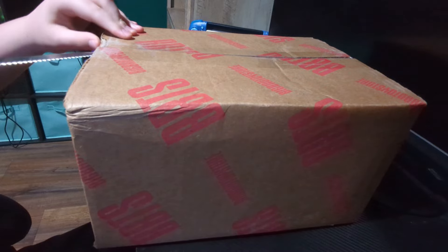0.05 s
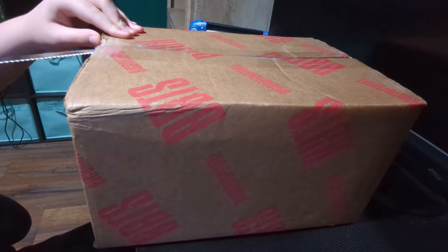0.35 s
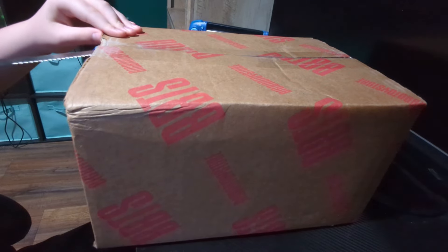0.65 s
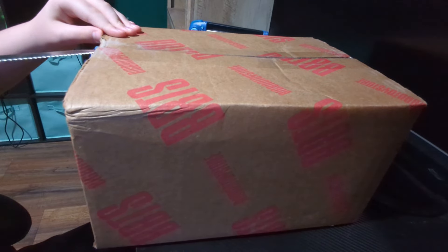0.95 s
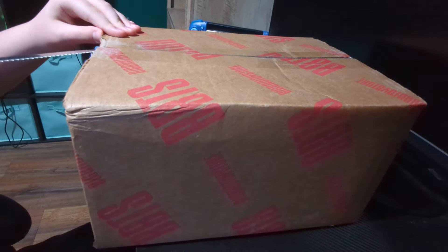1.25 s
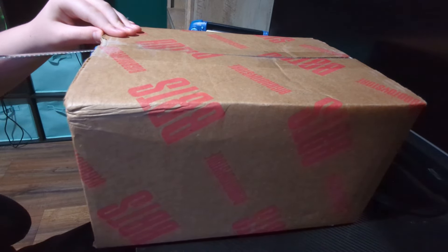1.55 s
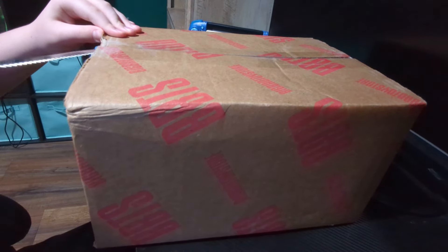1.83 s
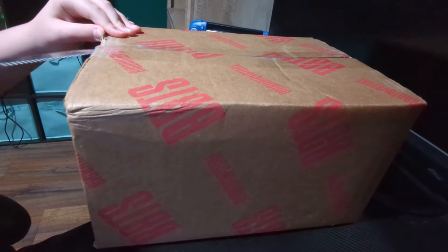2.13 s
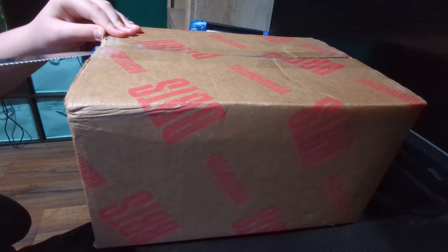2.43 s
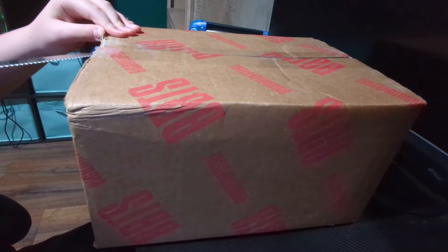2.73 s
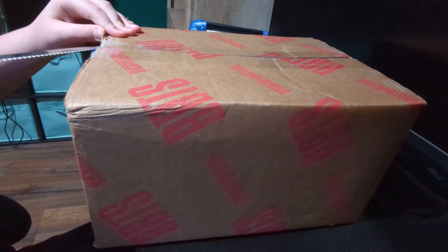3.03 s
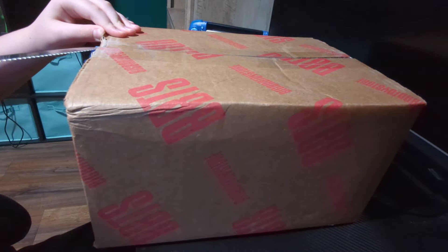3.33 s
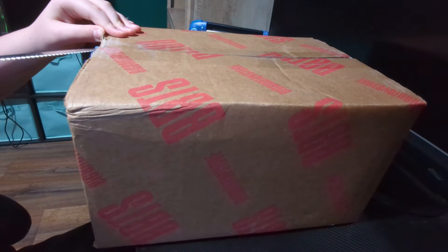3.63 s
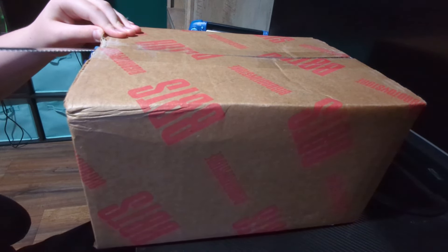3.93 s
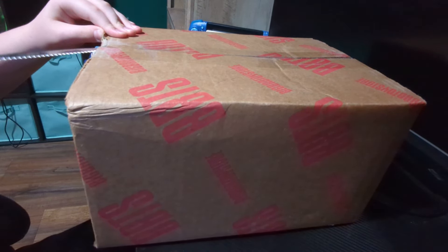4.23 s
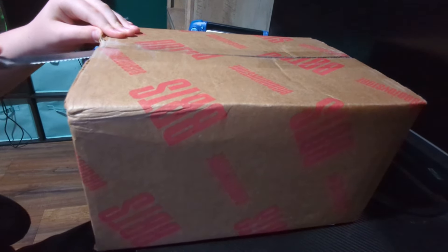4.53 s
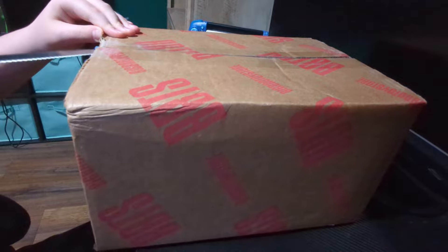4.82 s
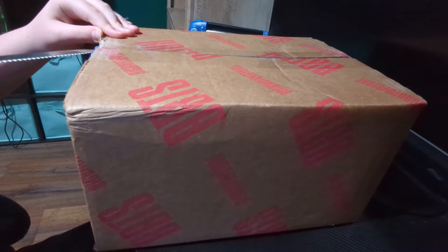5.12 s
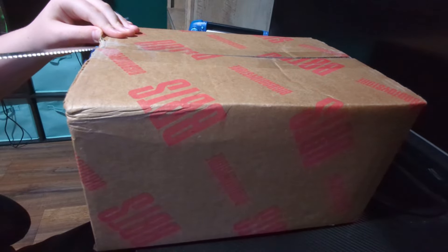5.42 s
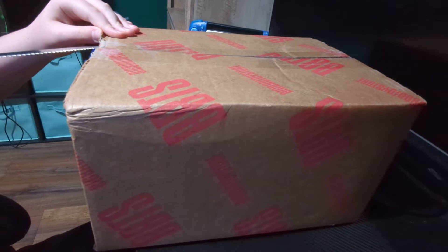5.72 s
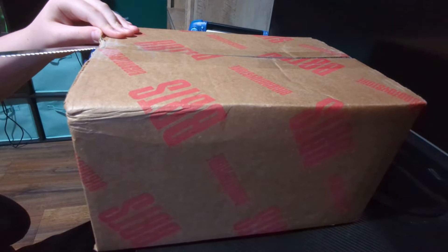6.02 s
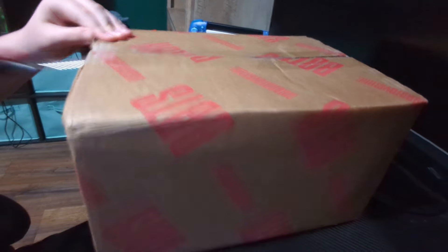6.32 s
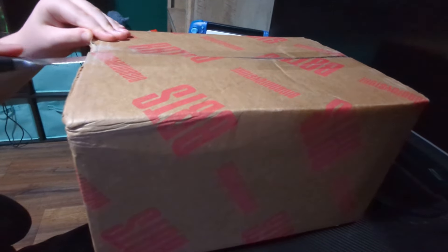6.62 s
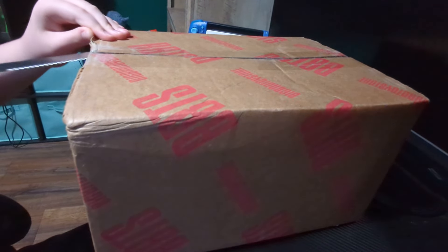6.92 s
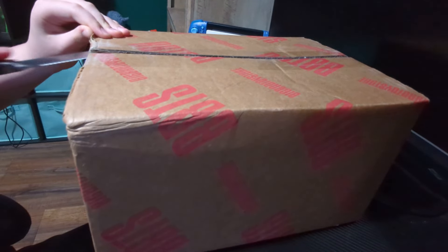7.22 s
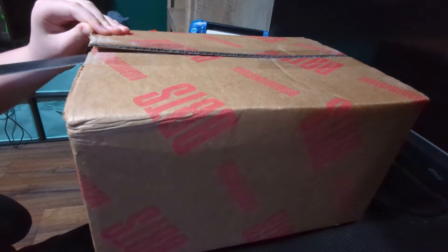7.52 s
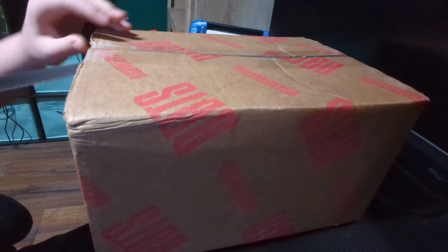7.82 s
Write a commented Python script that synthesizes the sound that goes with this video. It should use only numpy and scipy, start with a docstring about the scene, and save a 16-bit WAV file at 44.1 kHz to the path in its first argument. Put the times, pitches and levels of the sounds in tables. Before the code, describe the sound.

Scratchy knife strokes along a taped cardboard seam make the box thump, pausing briefly before the tape cracks apart.

```python
"""Serrated knife opening a box

A knife saws along the taped seam of a large cardboard box in a small room, a hand holding the lid.
The teeth rasp in card and tape; single teeth catch and slip, so the hollow box thumps.
Twice the blade breaks through with a snap, then slides on in the slit and ticks against the flaps."""
import sys
import numpy as np
from scipy import signal
from scipy.fft import rfft, irfft, next_fast_len
from scipy.io import wavfile
from scipy.ndimage import uniform_filter1d, map_coordinates

SR = 44100
rng = np.random.default_rng(int(sys.argv[2]) if len(sys.argv) > 2 else 0)


def waveform_to_disk(signal):
    """Save audio, clipped to [-1, 1], as 16-bit WAV at the path in sys.argv[1]."""
    frames = np.transpose(np.atleast_2d(signal))
    scaled = np.clip(frames, -1, 1) * 32767
    samples = np.round(scaled).astype(np.int16)
    wavfile.write(sys.argv[1], SR, samples)


N = 355401
THUMP_WINDOW_S, CRACK_WINDOW_S = 0.012, 0.003


def from_db(db):
    """Decibels to gain."""
    return 10 ** (np.asarray(db) / 20)


def unit_rms(x):
    """Scale to unit power."""
    return x / np.sqrt(np.mean(x ** 2) + 1e-20)


def at_level(x, db, window_s):
    """Scale so the loudest window has this RMS level."""
    peak_power = uniform_filter1d(x ** 2, int(window_s * SR)).max()
    return x * from_db(db) / np.sqrt(peak_power + 1e-20)


def band(x, low_hz, high_hz, order=2):
    """Causal band-pass."""
    sos = signal.butter(order, [low_hz, high_hz], "band", fs=SR, output="sos")
    return signal.sosfilt(sos, x + 1e-18)


def colour(x, spectrum):
    """Filter by a table of (frequency [Hz], gain [dB]); unit power."""
    size = next_fast_len(N)
    hz, db = np.transpose(spectrum)
    bin_hz = np.arange(size // 2 + 1) * SR / size
    gain = from_db(np.interp(np.log(bin_hz + 1), np.log(hz), db, left=-90, right=-90))
    return unit_rms(irfft(rfft(x, size) * gain, size)[..., :N])


def drift(per_s):
    """Smooth random wander; unit power."""
    points = rng.standard_normal(N // 20)
    return unit_rms(np.interp(np.arange(N) / SR * per_s, np.arange(len(points)), points))


def add(out, sound, start_s):
    """Mix a short sound in, in place."""
    at = max(round(start_s * SR), 0)
    out[at:at + len(sound)] += sound[:max(N - at, 0)]


def grains(per_s, spread_db):
    """Tiny random fractures, most of them weak."""
    sizes = from_db(spread_db * np.minimum(rng.exponential(1, N), 4))
    signs = rng.choice([-1, 1], N)
    return unit_rms(sizes * signs * (rng.random(N) < per_s / SR))


def stick_slip(per_s, unevenness, release_s):
    """Sudden catches that let go gradually, uneven in spacing and depth."""
    at = np.cumsum(rng.lognormal(0, unevenness, 3000) / per_s * SR).astype(int)
    at = at[at < N]
    catches = np.zeros(N)
    catches[at] = rng.random(len(at))
    return signal.lfilter([1], [1, -np.exp(-1 / (release_s * SR))], catches)


# Room noise: (frequency [Hz], gain [dB])
AIR_SPECTRUM = [(20, -20), (35, -8), (58, 1), (85, -7), (150, -5), (280, -27), (500, -25), (900, -32),
                (1500, -31), (3500, -38), (6500, -41), (8500, -46), (10500, -53), (16000, -59)]


def room_air(level_db):
    """Faint steady rumble, mostly common to both sides."""
    noise = rng.standard_normal(N) + 0.5 * rng.standard_normal((2, N))
    return from_db(level_db) * colour(noise, AIR_SPECTRUM)


# Knife strokes: (start [s], swell [s], fade by 20 dB [s], force [dB], tape share [dB], box share [dB])
KNIFE_STROKES = [(0, 0.014, 0.13, -56, -10, 11.5), (0.12, 0.096, 0.083, -64, -13, 8.5),
                 (0.231, 0.05, 0.048, -51, -8.5, 6.5), (0.33, 0.023, 0.1, -58, -5, 10.5),
                 (0.42, 0.032, 0.23, -53, -6.5, 7), (0.52, 0.16, 0.023, -51.5, -6.5, 7),
                 (0.71, 0.064, 0.13, -62.5, -11.5, 3), (0.818, 0.084, 0.12, -49.5, -3.5, 6.5),
                 (0.97, 0.022, 0.1, -62, -2, 1), (1.04, 0.035, 0.22, -59, -14.5, 2.5),
                 (1.18, 0.057, 0.27, -67.5, -6.5, 14), (1.471, 0.055, 0.13, -58.5, -12.5, 9),
                 (1.7, 0.038, 0.27, -74.5, -3, 7.5), (1.884, 0.043, 0.062, -50.5, -7, 6),
                 (1.98, 0.03, 0.2, -69.5, -4.5, 13.5), (2.177, 0.047, 0.044, -51, -7.5, 4),
                 (2.234, 0.032, 0.03, -49.5, -6.5, 12.5), (3.883, 0.02, 0.053, -56.5, -6, 9),
                 (4.0, 0.05, 0.15, -60.5, -5.5, 9.5), (4.097, 0.026, 0.066, -46, -4.5, 9.5),
                 (4.23, 0.041, 0.093, -54.5, -4.5, 6), (4.305, 0.051, 0.11, -41.5, -3, 8.5),
                 (4.47, 0.045, 0.28, -59.5, -10, 4.5), (4.679, 0.0055, 0.11, -49, -20, -3.5),
                 (4.66, 0.25, 0.075, -49.5, -3, 2.5), (6.06, 0.012, 0.068, -56, -10, 15.5),
                 (6.2, 0.13, 0.11, -60.5, -10, 8.5), (6.338, 0.0073, 0.045, -35.5, -4.5, 6.5),
                 (6.351, 0.062, 0.072, -33.5, -5.5, 10), (6.48, 0.04, 0.11, -58, -1.5, 11),
                 (6.58, 0.12, 0.074, -42, -7.5, 4), (6.78, 0.1, 0.19, -52, 1, 4),
                 (6.96, 0.11, 0.17, -62, 0.5, 7), (7.08, 0.1, 0.034, -47, -8, -2.5),
                 (7.21, 0.06, 0.16, -54.5, -1.5, 1), (7.39, 0.17, 0.066, -54, -1.5, 3),
                 (7.57, 0.041, 0.33, -48.5, -6, 1), (7.8, 0.19, 0.99, -62, -8, 5)]


def stroke_gains(swell_power=1.29, fade_power=1.46, full_bite_db=-46):
    """Each stroke swells and fades, sharing its force among box, card, tape and sizzle."""
    t, gains = np.arange(SR) / SR, np.zeros((4, N))
    for start_s, swell_s, fade_s, force_db, tape_db, box_db in KNIFE_STROKES:
        swell = np.sin(np.pi / 2 * np.minimum(t / swell_s, 1)) ** swell_power
        fade = from_db(-20 * (np.maximum(t - swell_s, 0) / fade_s) ** fade_power)
        # more tape, more sizzle; light strokes lose it
        sizzle_db = 2.5 + 1.6 * tape_db + 0.24 * min(force_db - full_bite_db, 0)
        for gain, share_db in zip(gains, (box_db, 0, tape_db, sizzle_db)):
            add(gain, from_db(force_db + share_db) * swell * fade, start_s)
    return gains


# Box panel modes: (frequency [Hz], level [dB], T60 [s])
BOX_MODES = [(58.8, -1, 0.45), (87.6, -4.5, 0.1), (102, 6.5, 0.19), (123.6, 1, 0.22), (161, 3, 0.31),
             (181, -13, 0.2), (213, -22, 0.052), (260, -2.5, 0.17), (277.2, 0.5, 0.17), (340, -7.5, 0.068),
             (409.3, 2.5, 0.078), (458.7, 3.5, 0.086), (497.4, 0.5, 0.087), (528.6, -2.5, 0.11),
             (630.6, -1.5, 0.096), (658, -6.5, 0.13), (760, 0, 0.05), (864, -10, 0.047), (940, -3, 0.033),
             (997, -9, 0.069)]


def box(force, scatter_db):
    """The panels ring; random mode levels stand for where they are pushed."""
    out = 0
    for (hz, db, t60_s), scatter in zip(BOX_MODES, rng.standard_normal(len(BOX_MODES))):
        radius, angle = from_db(-60 / (t60_s * SR)), 2 * np.pi * hz / SR
        pole_real = radius * np.cos(angle)
        mode = signal.lfilter([1, -pole_real], [1, -2 * pole_real, radius * radius], force + 1e-18)
        out = out + from_db(db + scatter_db * scatter) * mode
    return out


# Card rasp, tape hiss, tape sizzle: (frequency [Hz], gain [dB])
CARD_SPECTRUM = [(450, -6.5), (620, 13.5), (830, 7.5), (980, 7), (1120, 6.5), (1470, 10.5), (1950, 5.5),
                 (2400, 6.5), (3000, -3), (3600, -6.5), (4600, -34)]
TAPE_SPECTRUM = [(2800, -3.5), (3700, -5), (4800, 2), (5600, -4), (6400, 2), (7250, -2.5), (8300, 5.5),
                 (9200, 0.5), (9900, -7), (11000, -30), (12500, -27.5)]
SIZZLE_SPECTRUM = [(9500, -22), (10700, -4.5), (11700, 0.5), (12700, -6.5), (14300, -4.5), (15600, -11.5),
                   (17000, -40)]


def sawing():
    """Teeth drag through card and tape in jerks that also shake the box; the tape crackles."""
    box_gain, card_gain, tape_gain, sizzle_gain = stroke_gains()
    bite = stick_slip(per_s=72, unevenness=0.6, release_s=0.0055)
    jerks = from_db(13.4 * np.minimum(bite, 1) + 2.96 * drift(per_s=260))
    fibres = unit_rms(grains(per_s=3500, spread_db=3.5) * jerks)
    film = unit_rms(grains(per_s=5000, spread_db=2) * np.sqrt(jerks))
    crackle = grains(per_s=220, spread_db=2.5)
    tearing = film + from_db(-3) * fibres + from_db(-4) * crackle
    drone = box_gain * unit_rms(band(box(fibres, scatter_db=1.5), 29, 760, order=3))
    rasp = card_gain * colour(fibres + from_db(-5) * crackle, CARD_SPECTRUM)
    hiss = tape_gain * colour(tearing, TAPE_SPECTRUM)
    sizzle = sizzle_gain * colour(tearing, SIZZLE_SPECTRUM)
    return drone, rasp + hiss, sizzle


def bending_waves(travel_100hz_s, edge_db, size):
    """A kick crosses the card, treble ahead of bass, and reflects off four folded edges."""
    hz = np.arange(size // 2 + 1) * SR / size
    path_ratios = np.append(1, rng.uniform(1.409, 4.5, 4))[:, None]
    edge_gains = np.append(1, from_db(edge_db) * rng.choice([-1, 1], 4))[:, None]
    phase = 4 * np.pi * travel_100hz_s * path_ratios * np.sqrt(100 * hz)
    waves = edge_gains / np.sqrt(path_ratios) * np.exp(-1j * phase)
    return irfft(waves.sum(axis=0) / np.sqrt(1 + hz / 100), size)


# Tooth slips: (time [s], level [dB], pitch [Hz], boom share [dB], clack share [dB])
TOOTH_SLIPS = [(0.006, -41.5, 113, 0, -8.5), (0.054, -46, 136, -3, -6), (0.068, -41.5, 122, -4, -13),
               (0.276, -31, 145, -14, -21), (0.606, -45, 240, -13, -8), (0.638, -40.5, 147, -10, -18),
               (0.672, -44, 144, -7, -6), (0.771, -45.5, 175, -10, -4), (0.829, -46, 153, -13, -3.5),
               (0.896, -47.5, 240, -6, -4), (0.919, -47, 150, -5, -6), (0.955, -47, 123, 0, -8),
               (0.987, -40.5, 165, -6, -4), (1.213, -50.5, 155, 2, -10), (1.698, -40.5, 175, -7, -4.5),
               (1.897, -39.5, 119, -8, -21), (1.955, -42, 190, -8, -20), (2.015, -53, 157, -5, 1),
               (2.229, -38, 111, -5, -17), (2.252, -37.5, 155, -4, -11), (2.513, -41.5, 130, -12, -12.5),
               (2.56, -45.5, 123, -8, -26), (2.771, -44, 180, -12, -9), (3.075, -42.5, 135, -6, -18),
               (3.236, -51, 185, -6, -15), (3.892, -33, 135, 1, -27), (4.02, -52, 165, -9, -4),
               (4.116, -26.5, 138, -2.5, -15), (4.15, -39.5, 121, 0, -10), (4.342, -36, 126, 3, -4.5),
               (4.367, -36.5, 147, 0, -7), (4.812, -40.5, 147, -7, -20), (4.86, -43, 141, -16, -11),
               (5.092, -40.5, 142, -18, -15), (5.175, -38.5, 120, -19, -22), (5.425, -44, 132, -12, -19),
               (5.902, -47.5, 138, -6, -30), (6.068, -28.5, 142, -8, -16.5), (6.345, -23.5, 135, -1, -11),
               (6.395, -27, 165, 0, -4), (6.518, -34.5, 175, -4, -20), (6.661, -42, 147, 3, -2.5),
               (7.163, -48, 115, -11, 5), (7.173, -50, 150, -8, 6), (7.583, -48.5, 171, -15, 3),
               (7.612, -48, 159, -11, -3), (7.711, -44.5, 145, -10, -2), (7.882, -42.5, 107, 3, -24),
               (7.925, -43.5, 130, 1, -20), (8.027, -51, 189, -2, -2)]


def knocks(width_ratio=1.367):
    """A slipping tooth releases the lid: the hollow box thumps, with a boom below and a clack above."""
    out = np.zeros(N)
    for time_s, db, hz, boom_db, clack_db in TOOTH_SLIPS:
        wave = bending_waves(travel_100hz_s=0.007, edge_db=-4.5, size=2 ** 14)
        thump = unit_rms(wave) + from_db(5) * unit_rms(box(wave, scatter_db=2.5))
        boom = at_level(band(thump, 43.3, 81), db + boom_db, THUMP_WINDOW_S)
        knock = at_level(band(thump, hz / width_ratio, hz * width_ratio), db, THUMP_WINDOW_S)
        clack = at_level(band(thump, 239, 640, order=4), db + clack_db, THUMP_WINDOW_S)
        click = at_level(band(wave, 980, 2270), db + clack_db - 8, CRACK_WINDOW_S)
        add(out, boom + knock + clack + click, time_s)
    return out


# Tape and fibre breaks: (time [s], level [dB], brightness [dB])
BREAKS = [(0.008, -59.5, -14.5), (0.054, -49, 0), (0.25, -57, -10), (0.448, -51.5, -4.5), (0.47, -55, -1),
          (0.522, -49, -6), (0.668, -52, 1), (0.75, -60, 2), (0.901, -51, -2), (0.912, -52, -4),
          (0.999, -51, 7), (1.601, -61.5, -2.5), (1.698, -57.5, -4), (1.725, -60.5, -2.5),
          (1.898, -48, -2.5), (1.949, -54, 4), (2.077, -57.5, 1.5), (2.259, -48.5, 0), (2.279, -55, 2),
          (2.515, -66, -10.5), (2.772, -69.5, -3), (3.239, -73, -9), (3.893, -59, -8.5), (4.014, -59, -6),
          (4.05, -52.5, -4), (4.1016, -28.5, 1.5), (4.156, -39.5, -2), (4.328, -38.5, 2),
          (4.479, -52.5, -7), (5.004, -54, -5.5), (6.074, -38, -3), (6.1749, -48.5, -0.5),
          (6.226, -44.5, 4), (6.345, -20, -2), (6.364, -40, 4), (6.388, -31, -3), (6.408, -35.5, -6),
          (6.421, -42, -5), (6.442, -45, -3), (6.463, -42, -3), (6.502, -44, -1), (6.515, -39.5, -0.5),
          (6.949, -47.5, -5.5), (7.147, -42, 3), (7.164, -37.5, 1.5), (7.174, -37.5, -2), (7.183, -49, 2),
          (7.544, -39.5, 4), (7.557, -46, 2), (7.582, -31.5, 2.5), (7.611, -48, -5), (7.785, -45.5, -6),
          (7.885, -39, 1.5), (7.942, -49.5, -7.5), (7.953, -49, -2)]


def snaps(rise_s, crack_s, rustle_s, rustle_db):
    """Tape or fibre cracks within milliseconds; the card around it shivers briefly."""
    out, t = np.zeros(N), np.arange(SR // 5) / SR
    decay = np.exp(-t / crack_s) + from_db(rustle_db) * np.exp(-t / rustle_s)
    envelope = (1 - np.exp(-t / rise_s)) * decay
    for time_s, db, bright_db in BREAKS:
        bursts = rng.standard_normal((2, len(t))) * envelope
        low = at_level(band(bursts[0], 794, 2450), db - bright_db, CRACK_WINDOW_S)
        middle = at_level(band(bursts[1], 4330, 7900), db - 4 + 0.14 * bright_db, CRACK_WINDOW_S)
        top = at_level(band(bursts[0], 6900, 14100), db + bright_db, CRACK_WINDOW_S)
        add(out, low + middle + top, time_s)
    return out


# Blade slides: (start [s], end [s], level [dB], slope [dB/s])
SLIDES = [(0.2, 1.8, -62.5, -8), (2.0, 2.7, -70.5, -8.5), (3.48, 3.84, -71, -6), (3.9, 5.2, -67.5, 2),
          (4.67, 5.66, -61.5, -18.5), (5.33, 5.61, -72, 2), (5.57, 5.79, -71.5, 26), (5.87, 6.1, -76, 12.5)]
# Steel friction: (frequency [Hz], gain [dB])
STEEL_SPECTRUM = [(450, -39), (700, -8.5), (900, -6.5), (1080, -9), (1500, 0.5), (1700, -8), (1950, -4),
                  (2400, -8.5), (2800, -7.5), (3500, -16), (4600, -15.5), (5600, -16.5), (6600, -15),
                  (8800, -24), (10500, -28.5), (15000, -36.5)]


def rubbing(attack_s, release_s, box_db):
    """The flat of the blade slides in the slit; soft friction stirs the box in uneven pushes."""
    t, pressure = np.arange(N) / SR, 0
    for start_s, end_s, db, db_per_s in SLIDES:
        attack = np.clip((t - start_s) / attack_s, 0, 1)
        release = np.exp(-np.maximum(t - end_s, 0) / release_s)
        elapsed_s = np.clip(t - start_s, 0, end_s - start_s)
        pressure = pressure + attack * release * from_db(db + db_per_s * elapsed_s)
    friction = grains(per_s=12000, spread_db=3) * from_db(2.5 * drift(per_s=24))
    pushes = friction * from_db(4.9 * drift(per_s=16))
    stir = unit_rms(band(box(pushes, scatter_db=1), 45, 200))
    return pressure * (colour(friction, STEEL_SPECTRUM) + from_db(box_db) * stir)


# Tape splits: (start [s], length [s], level [dB])
TAPE_SPLITS = [(.991, 0.057, -49.5), (6.953, 0.068, -56), (7.002, .042, -47), (7.485, 0.062, -50)]
# Splitting tape: (frequency [Hz], gain [dB])
SPLIT_SPECTRUM = [(7000, -20), (8400, -10), (10000, -14), (11800, -4), (14000, -1), (15600, -3),
                  (17000, -30)]


def tape_zips():
    """Taut tape splits in a fast, nearly regular run of tiny tears."""
    force = np.zeros(N)
    for start_s, length_s, db in TAPE_SPLITS:
        add(force, from_db(db) * signal.windows.tukey(int(length_s * SR), 0.7), start_s)
    tears = stick_slip(per_s=290, unevenness=0.23, release_s=0.003)
    return force * colour(tears * rng.standard_normal(N), SPLIT_SPECTRUM)


# Whistle: (start [s], length [s], pitch [Hz], width [Hz], level [dB])
WHISTLE_BAND = (2.62, 0.84, 6400, 300, -87)


def whistle():
    """A thin, faint whistle of narrow-band noise while the knife rests."""
    start_s, length_s, hz, width_hz, db = WHISTLE_BAND
    gate = np.zeros(N)
    add(gate, signal.windows.tukey(int(length_s * SR), 0.3), start_s)
    tone = band(rng.standard_normal((2, N)), hz - width_hz / 2, hz + width_hz / 2, order=1)
    return from_db(db) * gate * unit_rms(tone)


def ring(modes, rise_s):
    """Decaying modes, all excited by one touch."""
    t = np.arange(SR // 4) / SR
    tones = sum(from_db(db - 60 * t / t60_s) * np.sin(2 * np.pi * hz * t) for hz, db, t60_s in modes)
    return tones * (1 - np.exp(-t / rise_s))


# Blade flicks: (time [s], level [dB])
FLICKS = [(4.1036, -34), (5.004, -53), (5.173, -64.5), (5.192, -67), (5.274, -62), (5.4165, -69),
          (5.432, -66), (5.521, -70.5), (6.1755, -54), (6.227, -50)]
# Blade modes: (frequency [Hz], level [dB], T60 [s])
BLADE_MODES = [(3870, -1, 0.035), (4670, 1, 0.06), (6930, 3.5, 0.082), (8839, -2, 0.085), (11550, -4, 0.11),
               (13940, -1.5, 0.07)]


def blade_ticks():
    """The steel pings when a tooth flicks free."""
    out, ping = np.zeros(N), ring(BLADE_MODES, rise_s=0.0005)
    for time_s, db in FLICKS:
        add(out, at_level(ping, db, CRACK_WINDOW_S), time_s)
    return out


# Blade-on-box modes: (frequency [Hz], level [dB], T60 [s])
CLACK_MODES = [(1320, -9.5, 0.016), (1645, -2.5, .018), (1810, -0.5, 0.023), (1945, -8, 0.056),
               (2130, -0.5, 0.018), (2230, -1, 0.02), (2460, -5.5, 0.018), (2750, -11, .015)]


def blade_clack(time_s, level_db):
    """The flat of the blade hits the box once as it leaves the slit."""
    out = np.zeros(N)
    add(out, at_level(ring(CLACK_MODES, rise_s=0.00058), level_db, CRACK_WINDOW_S), time_s)
    return out


def stereo(x, lag_s, left_db, right_db):
    """Direct sound; it reaches the right side later."""
    late = map_coordinates(x, [np.arange(N) - lag_s * SR], order=3)
    return np.array([x, late]) * from_db([[left_db], [right_db]])


def room(x, first_s, t60_s, echoes_per_s, crossover_hz, bass_gain, level_db):
    """Dense decaying reflections, unlike on each side, changing as knife and flaps move."""
    hop, t = SR // 40, np.arange(SR // 4) / SR
    wet, padded = np.zeros((2, N + SR)), np.pad(x, (hop, 2 * hop))
    decay = from_db(-60 * t / t60_s) * (t > first_s)
    window = np.sin(np.pi * np.arange(2 * hop) / (2 * hop))
    for at in range(0, N + hop, hop):
        chance = rng.uniform(-1, 1, (2, len(t)))
        echoes = np.sign(chance) * (abs(chance) < echoes_per_s / SR) * decay
        echoes /= np.sqrt(np.sum(echoes ** 2, axis=1, keepdims=True))
        tail = signal.fftconvolve(padded[None, at:at + 2 * hop] * window, echoes, axes=1)
        wet[:, at:at + tail.shape[1]] += tail
    wet = wet[:, hop:hop + N]
    # weak bass echoes keep long waves nearly alike on both sides
    bass = bass_gain * band(wet, 20, crossover_hz, order=1)
    return from_db(level_db) * (band(wet, crossover_hz, 8550, order=1) + bass)


def scene():
    """The cut lies to the left, the box nearly ahead; the room rumbles faintly."""
    drone, scrape, sizzle = sawing()
    cut = scrape + rubbing(attack_s=0.021, release_s=0.1, box_db=2.5)
    tape = sizzle + tape_zips() + snaps(rise_s=0.00077, crack_s=0.0014, rustle_s=0.018, rustle_db=-46)
    body = drone + knocks()
    steel = blade_ticks() + blade_clack(time_s=7.786, level_db=-26.5)
    cut_lag_s = 0.000231 + 0.00005 * drift(per_s=350)  # fibres break all along the blade
    direct = (stereo(cut, cut_lag_s, left_db=-2, right_db=-0.84)
              + stereo(tape, cut_lag_s, left_db=0.6, right_db=0)
              + stereo(body, lag_s=0.00016, left_db=-2.5, right_db=-1)
              + stereo(steel, lag_s=0.0001, left_db=-2.5, right_db=-1.5))
    reflections = room(cut + tape + body + from_db(-13) * steel, first_s=0.002, t60_s=0.15,
                       echoes_per_s=5000, crossover_hz=463, bass_gain=0.18, level_db=-1.5)
    return direct + reflections * from_db([[-0.5], [0.5]]) + room_air(level_db=-67.5) + whistle()


def record(dry):
    """High-pass at 37 Hz, steep low-pass at 16 kHz."""
    high_pass = signal.butter(6, 37, "high", fs=SR, output="sos")
    low_pass = signal.ellip(10, 0.1, 80, 16000, fs=SR, output="sos")
    return signal.sosfilt(low_pass, signal.sosfilt(high_pass, dry))


dry = scene()
out = record(dry)
waveform_to_disk(out)
```